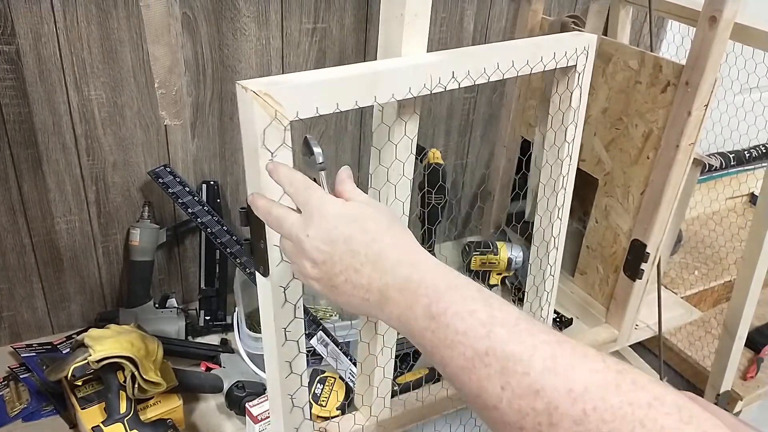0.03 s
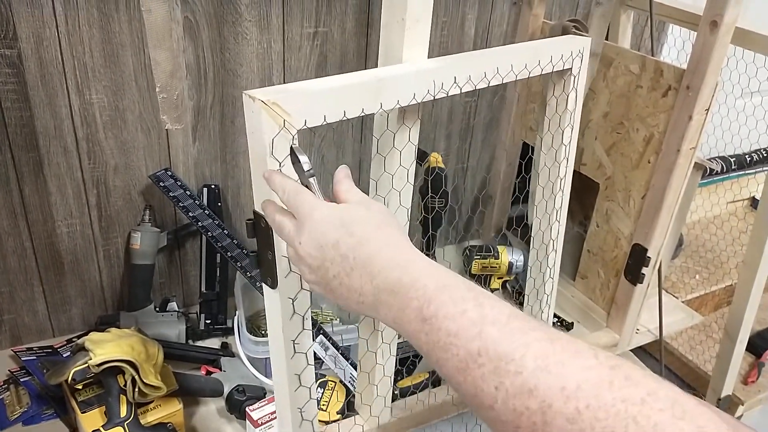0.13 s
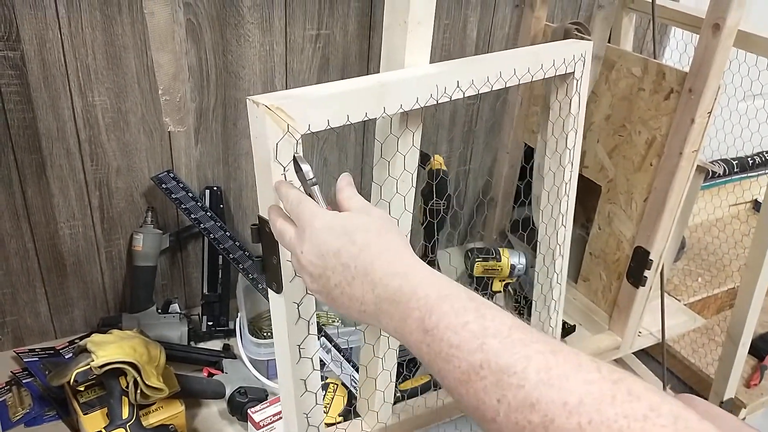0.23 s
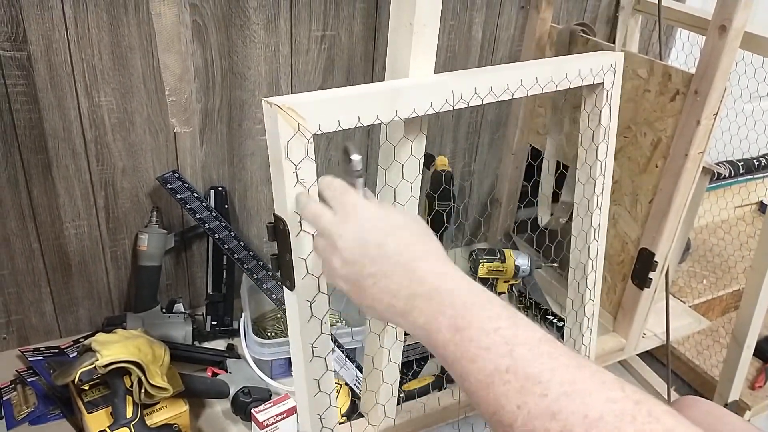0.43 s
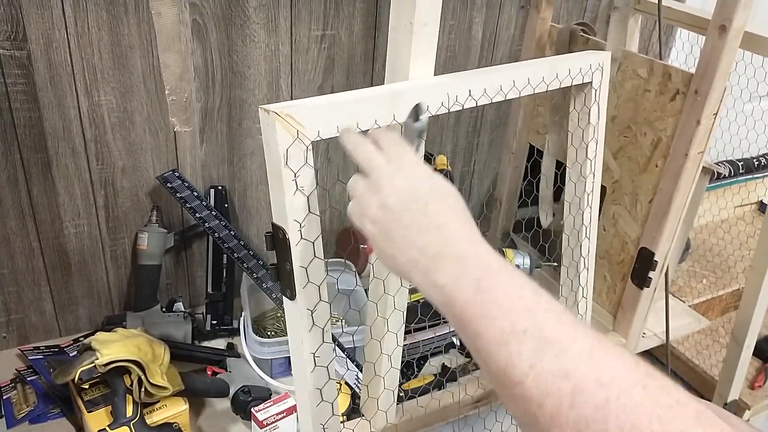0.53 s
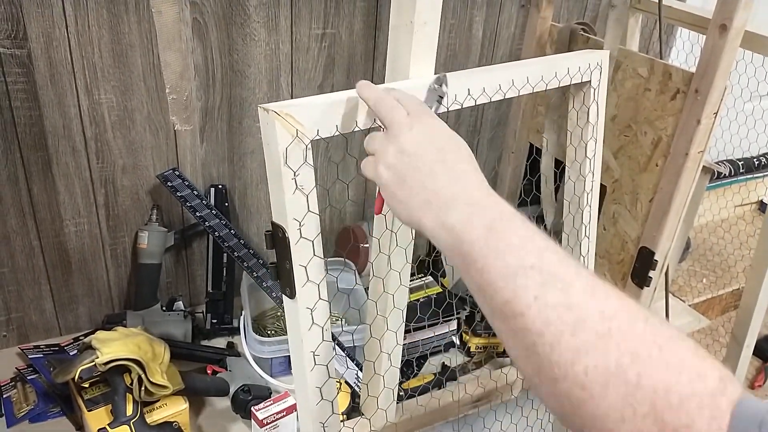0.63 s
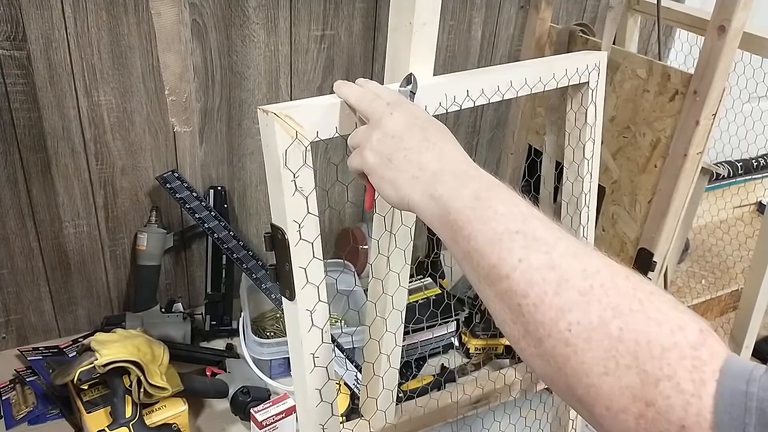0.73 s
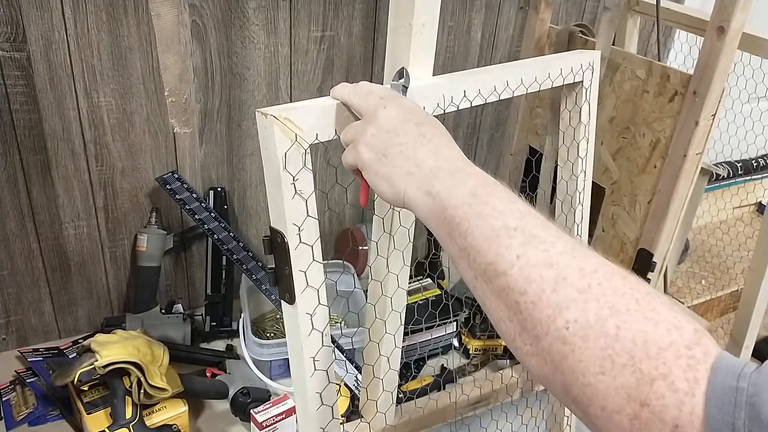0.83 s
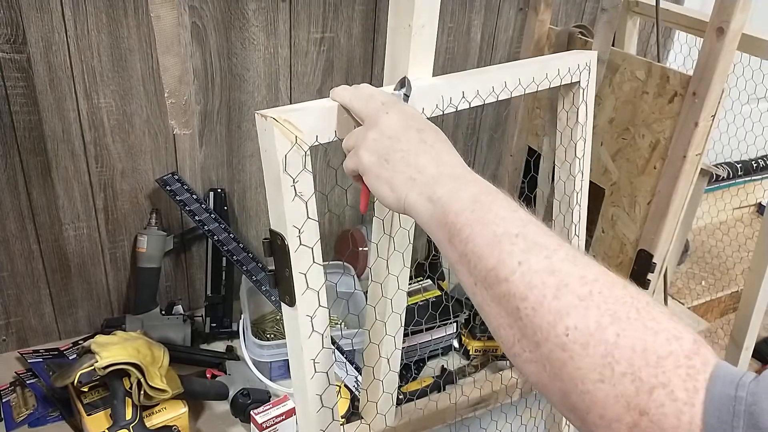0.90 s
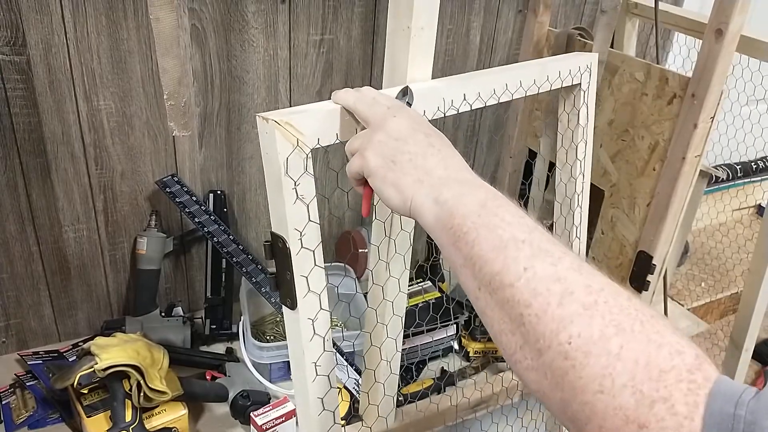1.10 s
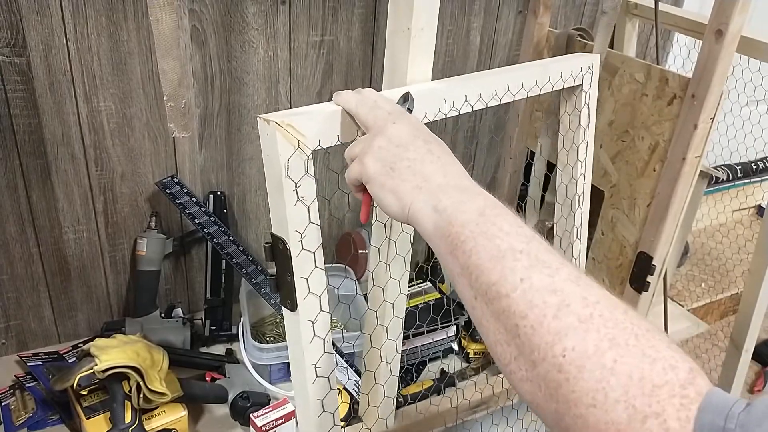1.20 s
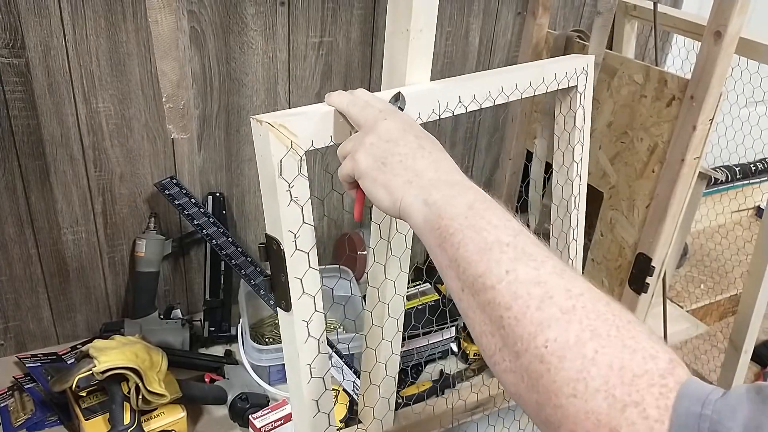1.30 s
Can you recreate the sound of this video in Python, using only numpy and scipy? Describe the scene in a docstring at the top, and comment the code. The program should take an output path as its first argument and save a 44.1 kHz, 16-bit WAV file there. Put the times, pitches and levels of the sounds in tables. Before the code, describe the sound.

Steel cutters scrape over chicken wire on a wooden frame, the rasp and thin sizzle building from the start with small ticks. Around 0.45 to 0.55 seconds come the loudest snags, bright pings and a bump that shakes the frame. The mesh chatters briefly near 0.7 to 0.85 seconds. The scraping fades, with faint wooden taps from about 1 to 1.35 seconds, in a quiet, small workshop.

```python
"""Steel cutters on chicken wire

In a small workshop, cutters are dragged up over chicken wire stapled to a wooden frame.
Tiny slips shake the frame, rasp on the wood and set the mesh sizzling. The jaws snag on wires
with bright pings, bump the top rail, settle on it with a short chatter and tap the wood faintly."""
import sys
import numpy as np
from scipy import signal
from scipy.fft import rfft, irfft, next_fast_len
from scipy.io import wavfile
from scipy.ndimage import uniform_filter1d, map_coordinates

SR = 44100
rng = np.random.default_rng(int(sys.argv[2]) if len(sys.argv) > 2 else 0)


def generate_wav(sig):
    """Save sig (samples, or channels by samples) to the path in sys.argv[1] as 16-bit PCM at SR."""
    pcm = np.round(np.clip(np.atleast_2d(sig).T, -1, 1) * 32767).astype(np.int16)
    wavfile.write(sys.argv[1], SR, pcm)


N = 59535

# room tone (frequency [Hz], level [dB])
AIR_COLOUR = [(18, -50), (30, -7), (173, -14), (277, -9.5), (369, -14), (518, -14), (921, -16.5),
              (2760, -18.5), (8950, -22), (15500, -37)]
# reverb decay (frequency [Hz], t60 [s])
ROOM_DECAY = [(100, 0.38), (1000, 0.12), (5000, 0.067), (14000, 0.04)]
# reverb send (frequency [Hz], gain [dB])
REVERB_SEND = [(80, -29.5), (300, -25), (700, -11.5), (2000, -4), (8000, 1.5)]
# stereo tilt (frequency [Hz], left minus right [dB])
STEREO_TILT = [(60, -0.5), (400, -0.5), (750, 2.5), (1200, 1.5), (2000, 6), (3300, 1), (5500, -2),
               (9000, -13), (15000, -9)]
# the hand shifts on the handles (time [s], level [dB], length [s])
GRIP_RUBS = [(1.05, -64, .09), (1.235, -78, 0.043)]
# tone of the rubbing (frequency [Hz], level [dB])
GRIP_COLOUR = [(500, -15), (1600, 8), (2800, -1.5), (4200, 1.5), (5500, -8), (9000, -23), (14000, -28)]
# fader for the frame's rumble (time [s], level [dB])
RUMBLE_FADER = [(0, -53.5), (.02, -58.5), (.06, -67.5), (.11, -54.5), (.18, -45.5), (.245, -42),
                (.285, -37.5), (.34, -35), (.43, -28), (.5, -32.5), (.56, -36), (.63, -37.5), (.66, -44),
                (.685, -42.5), (.76, -40.5), (.88, -48), (.97, -51), (1.12, -59), (1.22, -63.5),
                (1.35, -64)]
# modes of the wooden frame (frequency [Hz], width [Hz], level [dB])
FRAME_MODES = [(85.2, 14, -1), (109, 19, -7.5), (137.5, 15.8, -4), (201, 18.5, -2), (270, 46, -13.5),
               (338, 16, -10), (363.35, 7.8, -7), (382.7, 11.4, -6.5)]
# the tool shoves the frame (time [s], peak [dB], most excited frequency [Hz])
SHOVES = [(0.166, -42, 187), (.272, -33.5, 182), (.478, -26.5, 212), (.488, -24.5, 205), (0.527, -32, 350),
          (.745, -44, 141), (0.984, -50, 142), (1.058, -54.5, 135)]
# fader for the rasp on wood (time [s], level [dB])
RASP_FADER = [(0, -63), (.1, -65), (.14, -53.5), (.27, -49), (.36, -41.5), (.42, -39.5), (.46, -37),
              (.53, -40), (.56, -46), (.62, -47), (.66, -56), (.76, -53), (.88, -60), (.97, -60),
              (1.01, -71.5), (1.045, -75), (1.1, -75), (1.16, -66), (1.21, -65), (1.28, -91)]
# tone of the rasp's grit (frequency [Hz], level [dB])
GRIT_COLOUR = [(120, -44.5), (300, -9), (480, -3), (780, 0), (1100, -1.5), (1450, -6), (2200, -4.5),
               (3200, -16), (4500, -18), (6500, -19.5), (15000, -75)]
# modes of the rail under the tool (frequency [Hz], width [Hz], level [dB])
RAIL_MODES = [(485.3, 36, 2), (684, 14, -1.5), (960, 55, -1), (1054, 29, 3), (1124, 34, 1.5),
              (1373, 51, -9), (1519, 210, -4), (1896, 71, -1.5), (1957, 20, -0.5), (2260, 67, -0.5),
              (2653, 230, -6), (3410, 53, -5)]
# the tool knocks on wood (time [s], level [dB], t60 [s], ring pitch [Hz])
WOOD_TAPS = [(.005, -65, 0.12, 305), (0.4569, -32.5, 0.054, 2040), (0.529, -38.5, 0.054, 1130),
             (0.961, -65, 0.025, 1400), (1.1323, -53, 0.013, 2640), (1.181, -49.5, 0.052, 890),
             (1.335, -58, 0.085, 840)]
# tone of the knocked wood (frequency [Hz], level [dB])
WOOD_COLOUR = [(50, -57), (130, 9), (330, 11), (550, -7.5), (950, 10.5), (1600, -17), (2500, -13),
               (6000, -17.5), (12000, -57)]
# the mesh chatters as the jaws settle (time [s], level [dB], length [s])
CHATTER_SWELLS = [(0.669, -52.5, .075), (.75, -48.5, 0.091)]
# modes of the loose mesh (frequency [Hz], width [Hz], level [dB])
MESH_MODES = [(1858, 47, 2.5), (1993, 100, -1), (1980, 88, 3), (2510, 270, -10.5)]
# fader for the wire's sizzle (time [s], level [dB])
SIZZLE_FADER = [(0, -64.5), (.055, -62.5), (.11, -54), (.26, -49), (.31, -43), (.41, -43), (.44, -37),
                (.48, -42.5), (.51, -37), (.56, -52.5), (.65, -61), (.73, -67), (.83, -66), (.94, -60.5),
                (1.03, -74.5), (1.09, -68.5), (1.15, -77.5), (1.27, -70), (1.32, -80)]
# hiss of steel on wire (frequency [Hz], level [dB])
HISS_COLOUR = [(1500, -6), (3500, -0.5), (5100, -5), (6300, -4.5), (7800, -1), (9700, -15), (11500, -12.5),
               (13500, -22), (15700, -44)]
# modes of the cutters and wire (frequency [Hz], width [Hz], level [dB])
STEEL_MODES = [(5900, 235, -2.5), (6410, 120, 3), (6760, 79, 2), (7420, 80, -0.5), (7910, 18, 3),
               (8450, 520, -5.5), (9367, 91, 0.5), (9880, 115, -1), (11000, 54, -4)]
# the jaws snag on a wire (time [s], level [dB], ping pitch [Hz], t60 [s])
WIRE_SNAGS = [(0.0633, -42, 8180, 0.031), (0.136, -46, 7800, 0.02), (0.254, -36, 7300, 0.017),
              (0.4284, -32, 9100, 0.037), (0.4554, -27, 7300, 0.039), (0.4928, -31.5, 7530, .1),
              (0.528, -37, 9200, 0.025), (0.585, -45.5, 9000, 0.013), (0.673, -48.5, 6200, 0.1),
              (0.7438, -44.5, 6660, 0.093), (0.8825, -54.5, 6700, .07), (0.9624, -49, 6670, 0.053),
              (1.1762, -54, 6440, .04), (1.2376, -55.5, 4680, 0.014)]

SLIPS_PER_S = 1500
MESH_WIDTH, RASP_WIDTH = .7, .35  # share of the slips that each ear hears alone


def amp(db):
    """Decibels to gain."""
    return 10 ** (np.asarray(db) / 20)


def unit(x):
    """x scaled to rms 1."""
    return x / np.sqrt(np.mean(x ** 2) + 1e-20)


def along(points, hz):
    """(Hz, value) points read on a log axis."""
    freqs, values = np.transpose(points)
    return np.interp(np.log(hz + 1), np.log(freqs + 1), values)


def fader(rows):
    """Gain per sample from (s, dB) points."""
    return amp(np.interp(np.arange(N) / SR, *np.transpose(rows)))


def wobble(per_s):
    """A smooth random curve with per_s knots a second."""
    return map_coordinates(rng.standard_normal(2048), [np.arange(N) * per_s / SR], mode="wrap")


def filtered(x, response):
    """x through a frequency response."""
    size = 2 * next_fast_len(N)
    return irfft(rfft(x, size) * response(np.fft.rfftfreq(size, 1 / SR)), size)[..., :N]


def coloured(x, points):
    """x through a minimum-phase EQ drawn as (Hz, dB) points."""
    def response(hz):
        cepstrum = irfft(np.log(amp(along(points, hz))))
        half = len(cepstrum) // 2
        return np.exp(rfft(np.r_[cepstrum[0], 2 * cepstrum[1:half], np.zeros(half)]))
    return filtered(x, response)


def ring(x, modes):
    """x through a body's resonances, summed with alternating polarity."""
    return filtered(x, lambda f: sum(
        (-1) ** k * amp(db) * 1j * f * width / (hz * hz - f * f + 1j * f * width)
        for k, (hz, width, db) in enumerate(modes)))


def steady(x, samples):
    """x levelled to rms 1 over a sliding window."""
    return x / np.sqrt(np.abs(uniform_filter1d(x ** 2, samples)) + 1e-20)


def burst(start, t60, attack_s):
    """A fast attack and an exponential decay."""
    t = np.maximum(np.arange(N) / SR - start, 0)
    return (1 - np.exp(-t / attack_s)) * amp(-60 * t / t60)


def swells(rows):
    """Envelope of short strokes that rise faster than they fall."""
    t = np.arange(N) / SR
    return sum(amp(db) * np.sin(np.pi * np.clip((t - start) / length, 0, 1) ** 0.46)
               for start, db, length in rows)


def slips(per_s, spread_db):
    """Random stick-slip impulses of uneven size."""
    clicks = (rng.random(N) < per_s / SR) * rng.choice([-1, 1], N)
    return clicks * amp(spread_db * rng.standard_normal(N).clip(-2, 2))


def scattered(per_s, spread_db, width):
    """Slips all over a surface: some reach both ears alike, some only one."""
    centre = slips(per_s * (1 - width), spread_db)
    return centre + np.array([slips(per_s * width, spread_db) for ear in "LR"])


def room_air(level_db=-68):
    """A quiet, wide bed of room tone."""
    noise = rng.standard_normal((2, N)) + 0.13 * rng.standard_normal(N)
    return amp(level_db) * unit(coloured(noise, AIR_COLOUR))


def workshop(x):
    """The room's short diffuse tail, different at each ear; the lows hang longest."""
    hz, t, spectrum = signal.stft(rng.standard_normal((2, SR // 3)), SR, nperseg=256)
    decay = amp(-60 * t / along(ROOM_DECAY, hz)[:, None])
    tail = signal.istft(spectrum * decay, SR, nperseg=256)[1]
    wet = signal.fftconvolve(x, tail / np.linalg.norm(tail[0]), axes=1)[:, :N]
    return filtered(wet, lambda f: amp(along(REVERB_SEND, f)))


def grip():
    """Faint dry rubbing as the tool is settled in the hand."""
    friction = scattered(SLIPS_PER_S, spread_db=1.5, width=RASP_WIDTH)
    return swells(GRIP_RUBS) * unit(coloured(friction, GRIP_COLOUR))


def frame(rumble_db=-8.5, judder_db=0.77):
    """The jerky drag keeps each mode of the frame rumbling; shoves thud through the same modes."""
    force = fader(RUMBLE_FADER) * amp(judder_db * wobble(per_s=31))
    out = 0
    for hz, width, db in FRAME_MODES:
        mode = ring(slips(per_s=500, spread_db=2.5), [(hz, width, 0)])
        mode = ring(mode, [(hz, 4 * width, 0)])  # trims the skirts
        out = out + amp(rumble_db + db) * force * steady(mode, samples=1500)
    for start, db, hz in SHOVES:
        shove = signal.unit_impulse(N, int(start * SR))
        thud = ring(ring(shove, FRAME_MODES), [(hz, 120, 0)])
        out = out + amp(db) * thud / np.abs(thud).max()
    return out


def rasp(trim_db=-0.5, body_db=2, flutter_db=2.6):
    """Steel scrapes the wooden rail: dry grit over the rail's ringing body."""
    grit = unit(coloured(scattered(SLIPS_PER_S, spread_db=5.5, width=RASP_WIDTH), GRIT_COLOUR))
    body = unit(ring(scattered(SLIPS_PER_S, spread_db=8, width=RASP_WIDTH), RAIL_MODES))
    scrape = amp(flutter_db * wobble(per_s=160)) * (grit + amp(body_db) * body)
    return fader(RASP_FADER) * amp(trim_db) * steady(scrape, samples=1000)


def taps(clack_db=0.5, clack_width_hz=1020):
    """The tool knocks on wood: one shared woody tone, plus a clack at each tap's own pitch."""
    wood = 1.08 * steady(coloured(rng.standard_normal(N), WOOD_COLOUR), samples=400)
    out = 0
    for start, db, t60, hz in WOOD_TAPS:
        band = [(hz, clack_width_hz, 0)]
        clack = steady(ring(ring(rng.standard_normal((2, N)), band), band), samples=300)
        out = out + amp(db) * burst(start, t60, attack_s=0.00065) * (wood + amp(clack_db) * clack)
    return out


def chatter(flutter_db=3.0):
    """Loose mesh buzzes roughly against the frame in short swells."""
    contacts = scattered(per_s=600, spread_db=2.5, width=RASP_WIDTH)
    buzz = steady(ring(contacts, MESH_MODES), samples=900)
    return swells(CHATTER_SWELLS) * amp(flutter_db * wobble(per_s=200)) * buzz


def steel_friction(shimmer_db=-2.5):
    """Steel slips on wire: an even hiss with the metal's ringing shimmer on top."""
    hiss = unit(coloured(scattered(2 * SLIPS_PER_S, spread_db=0, width=MESH_WIDTH), HISS_COLOUR))
    shimmer = unit(ring(scattered(SLIPS_PER_S, spread_db=7, width=MESH_WIDTH), STEEL_MODES))
    return steady(hiss + amp(shimmer_db) * shimmer, samples=900)


def wire(sizzle_db=-2.5, tick_db=-2.5, ping_db=-4.5, ping_width_hz=700):
    """The mesh sizzles under the sliding tool; each snag lets go with a tick and a ping."""
    out = fader(SIZZLE_FADER) * amp(sizzle_db + wobble(per_s=133.3)) * steel_friction()
    tick = amp(tick_db) * steady(steel_friction(), samples=130)
    for start, db, hz, t60 in WIRE_SNAGS:
        band = [(hz, ping_width_hz, 0)]
        ping = amp(ping_db) * steady(ring(ring(rng.standard_normal(N), band), band), samples=200)
        out = out + amp(db) * burst(start, t60, attack_s=0.0014) * (tick + ping)
    return out


def scene():
    """The mix: woody mids lean left, bright wire leans right, over quiet room air."""
    dry = frame() + rasp() + wire() + chatter() + taps() + grip()
    panned = filtered(dry + workshop(dry), lambda f: amp(np.outer([.5, -.5], along(STEREO_TILT, f))))
    return panned + room_air()


def record(dry):
    """The microphone thins the deep bass, softens the top and cuts off at its band limit."""
    mic_eq = [(38, -5), (52, -13), (76, -1.5), (13000, -2), (15700, -2.5)]  # (frequency [Hz], gain [dB])
    return filtered(coloured(dry, mic_eq), lambda hz: hz < 15740)


dry = scene()
out = record(dry)
generate_wav(out)
```